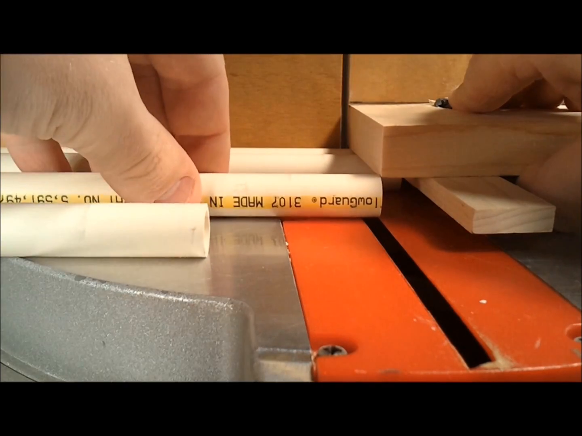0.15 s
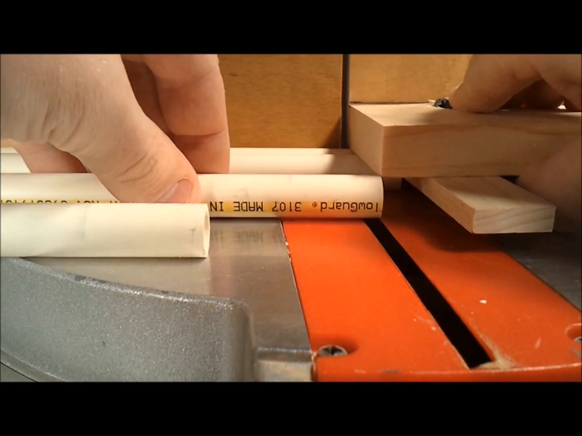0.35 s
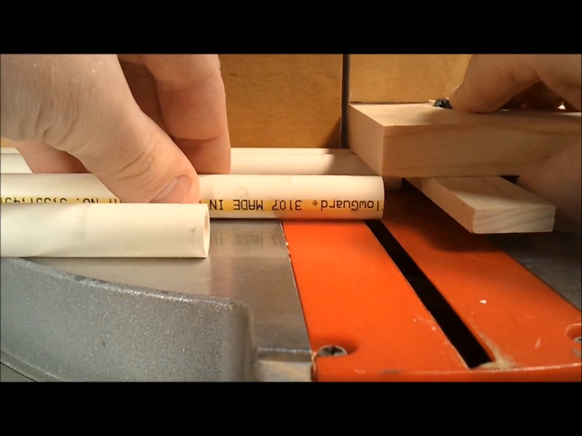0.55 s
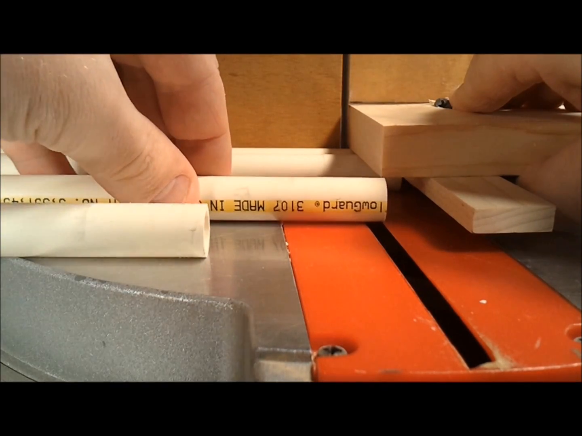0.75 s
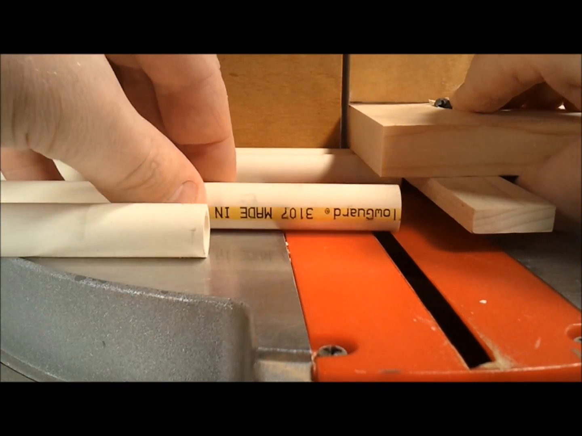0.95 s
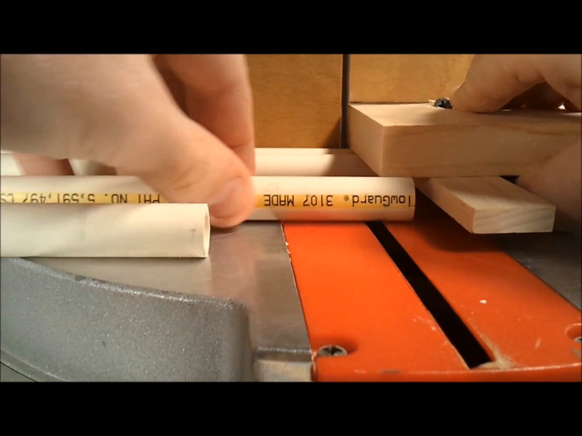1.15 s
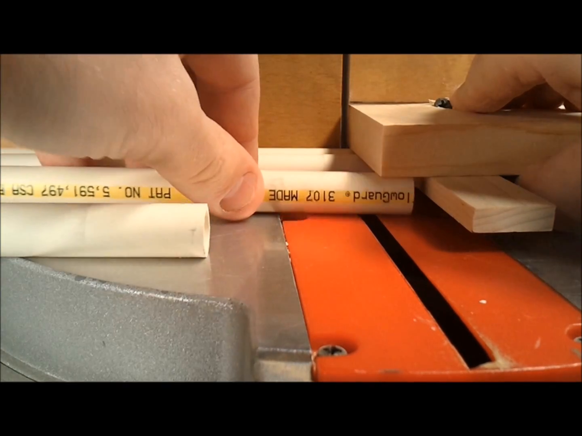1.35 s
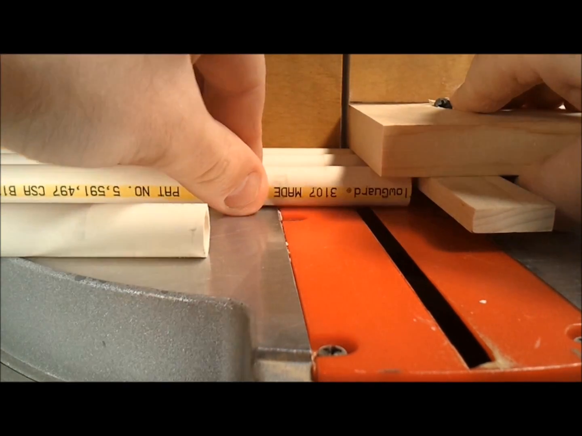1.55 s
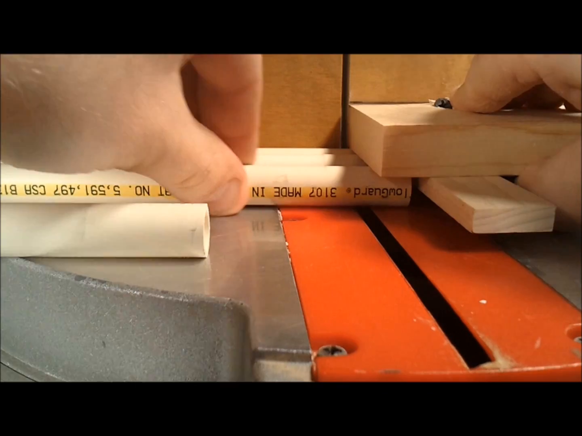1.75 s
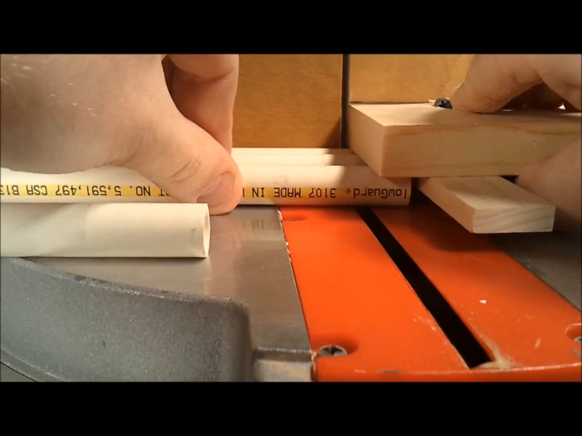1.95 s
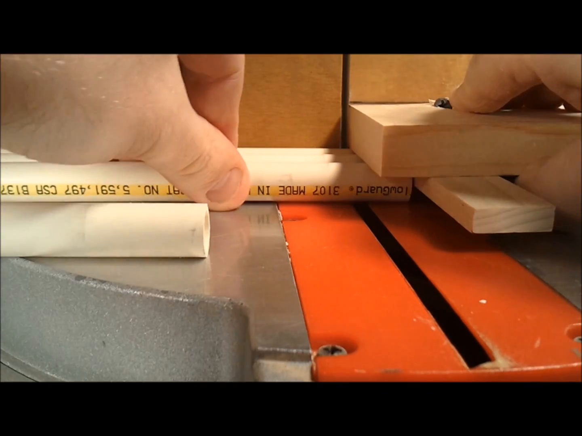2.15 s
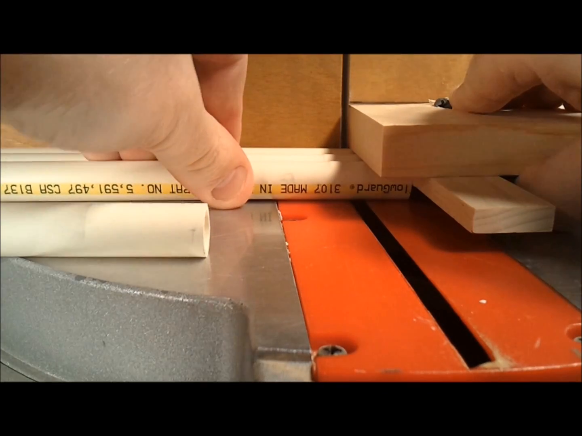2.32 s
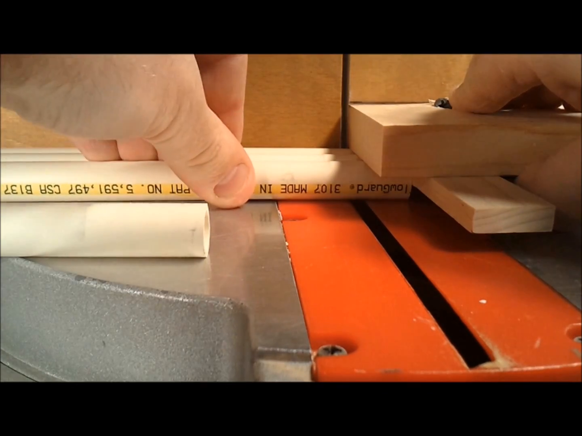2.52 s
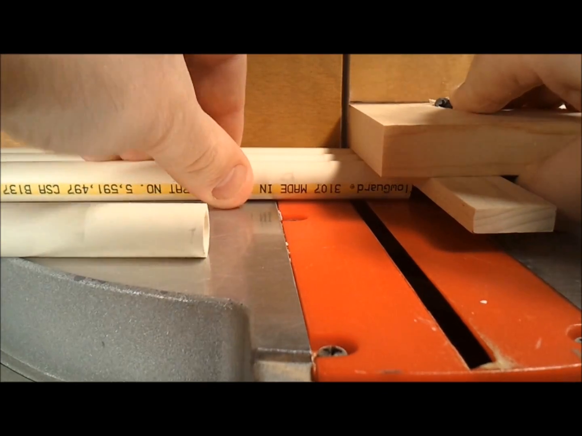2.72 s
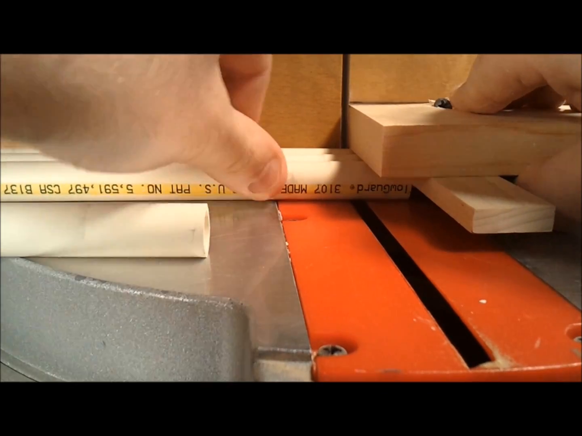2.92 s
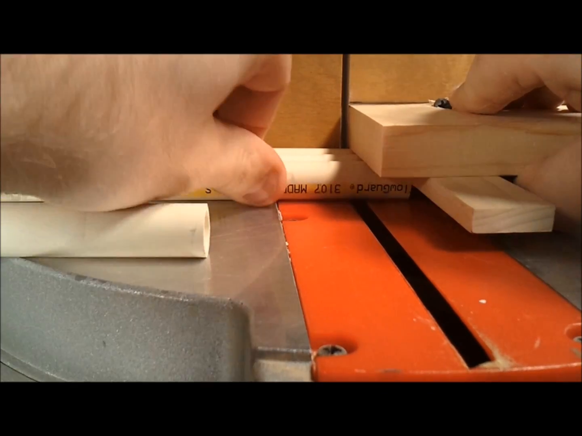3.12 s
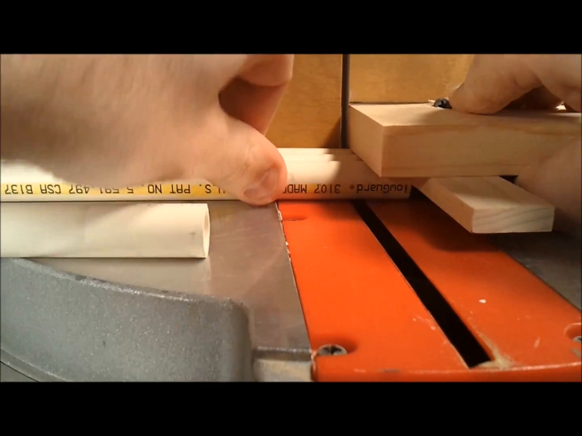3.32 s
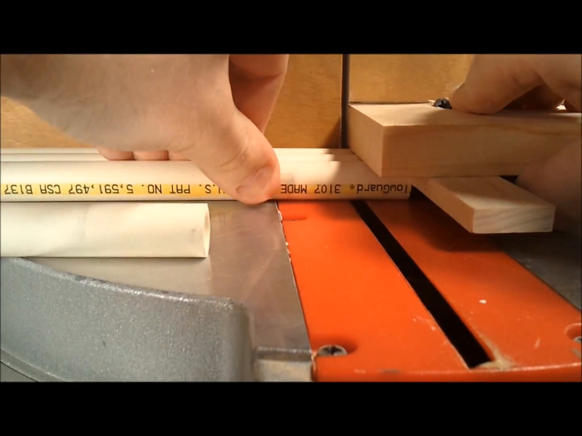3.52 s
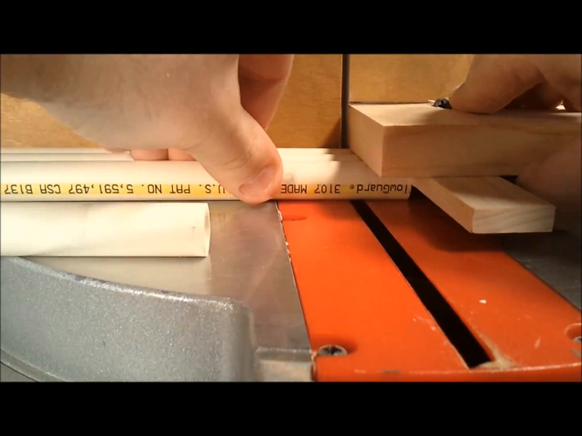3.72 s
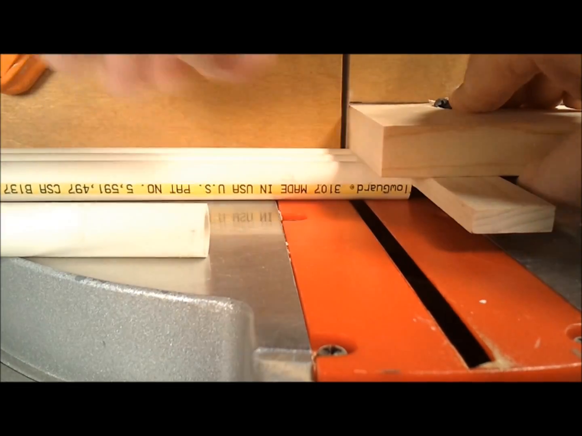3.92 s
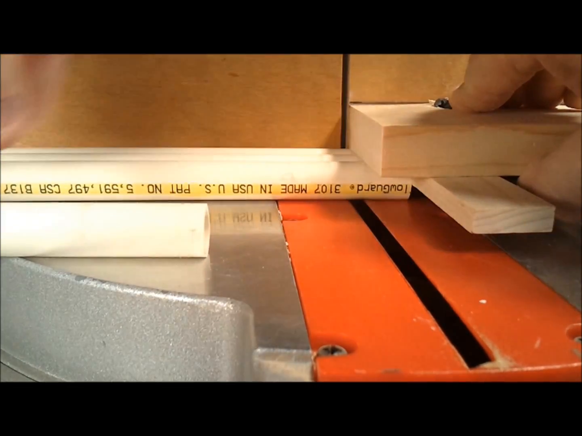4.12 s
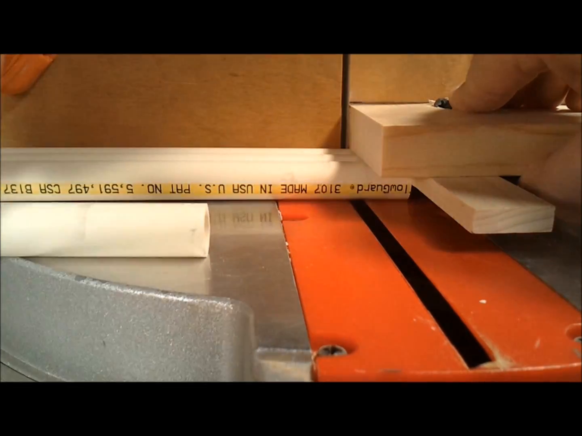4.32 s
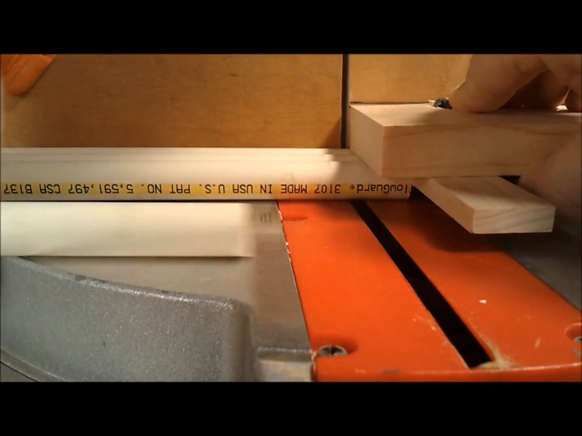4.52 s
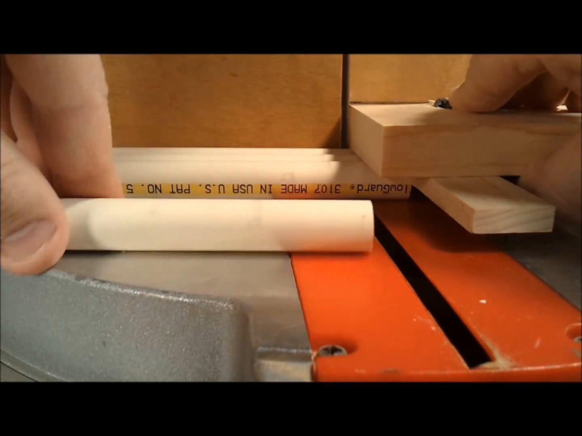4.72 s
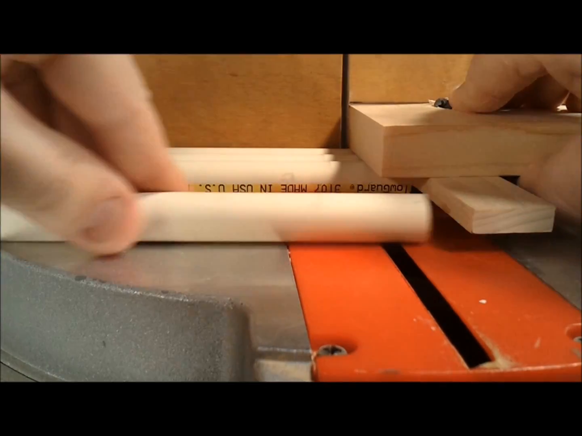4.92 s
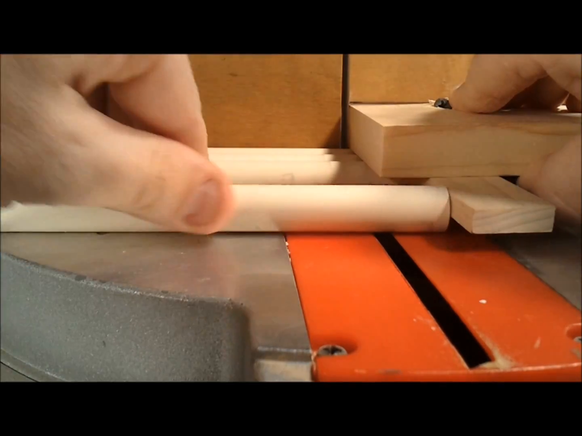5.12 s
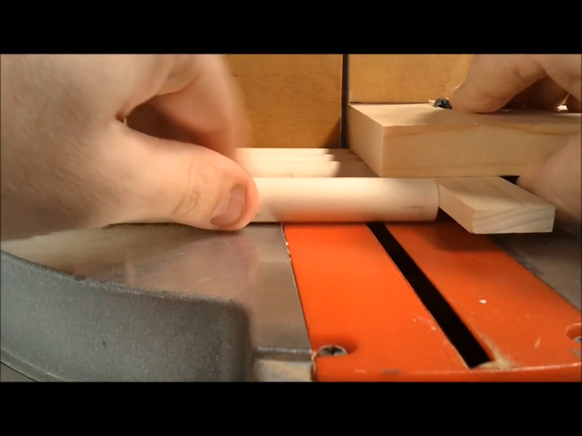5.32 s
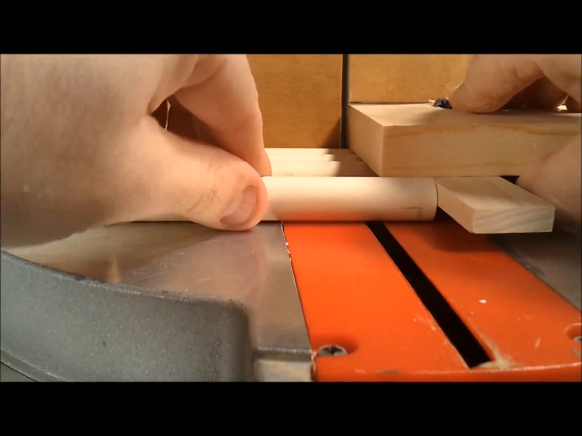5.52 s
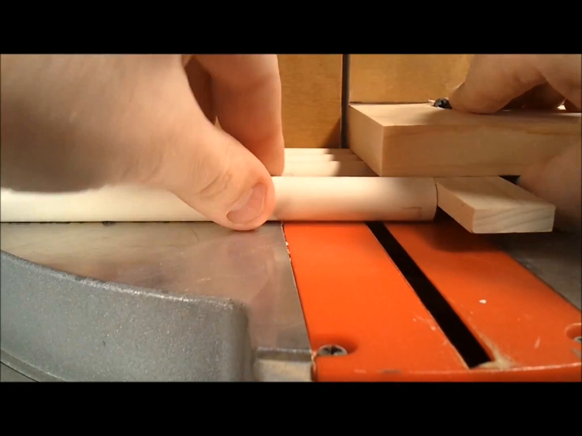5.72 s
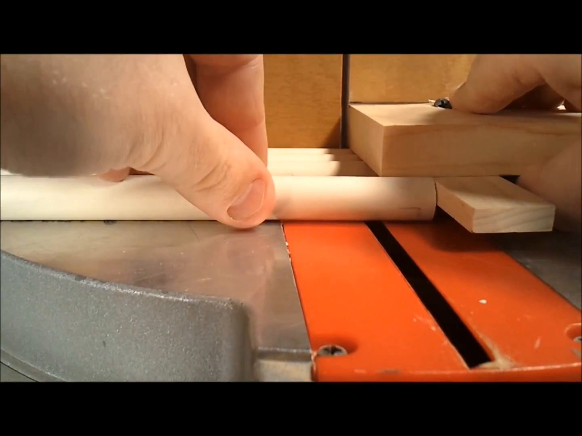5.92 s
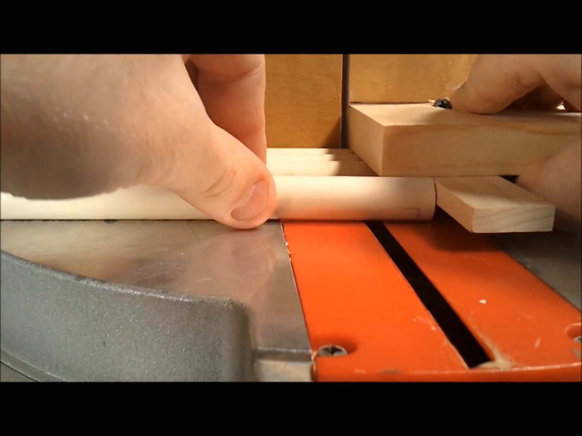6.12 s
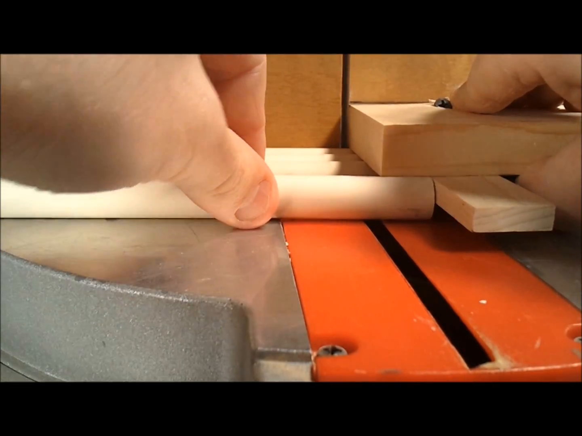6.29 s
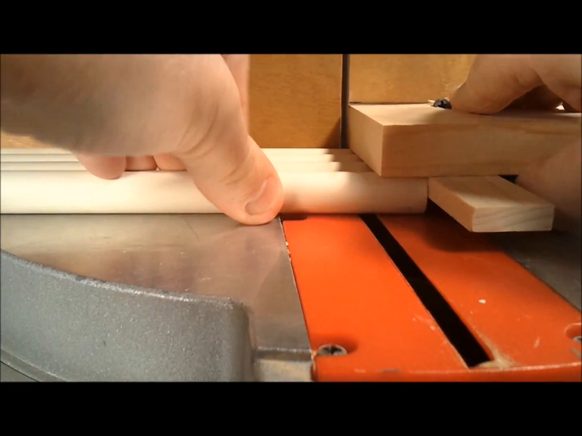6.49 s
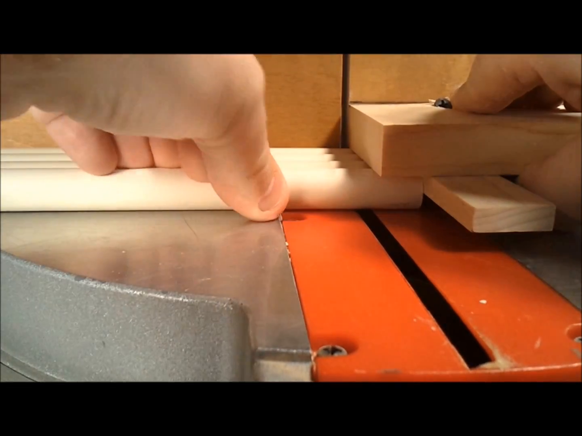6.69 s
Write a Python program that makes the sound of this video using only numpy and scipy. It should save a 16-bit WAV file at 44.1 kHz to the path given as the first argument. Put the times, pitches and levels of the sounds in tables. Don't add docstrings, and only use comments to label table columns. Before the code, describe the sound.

Hollow plastic clacks in uneven bursts, with dry gritty scrapes and small squeaks between them, near the microphone in a quiet small workshop.

```python
import sys
import numpy as np
from scipy import signal
from scipy.fft import rfft, irfft, next_fast_len
from scipy.io import wavfile
from scipy.ndimage import uniform_filter1d, map_coordinates

SR = 44100
rng = np.random.default_rng(int(sys.argv[2]) if len(sys.argv) > 2 else 0)


def natural_amplitude(level_db):
    exponent = np.asarray(level_db, float) / 20
    return 10 ** exponent


def inscribe(sig):
    pcm = np.round(np.clip(np.atleast_2d(sig).T, -1, 1) * 32767)
    wavfile.write(sys.argv[1], SR, pcm.astype(np.int16))


N = 297675


def unit(x):
    return x / np.sqrt(np.mean(x ** 2) + 1e-20)


def along(points, hz):
    f, v = np.transpose(points)
    return np.interp(np.log(hz + 1), np.log(f + 1), v)


def wobble(rate):
    knots = rng.standard_normal(int(N * rate / SR) + 4)
    return map_coordinates(knots, [np.arange(N) * rate / SR])


def filtered(x, response):
    m = next_fast_len(len(x) + 8192)
    spectrum = rfft(x, m) * response(np.fft.rfftfreq(m, 1 / SR))
    return irfft(spectrum, m)[:len(x)]


def resonances(peaks):
    def response(f):
        total = 0
        for k, (centre, width, db) in enumerate(peaks):
            damping = 1j * f * width
            total = total + (-1) ** k * natural_amplitude(db) * damping / (centre * centre - f * f + damping)
        return total
    return response


def near(hz, centre_hz, octaves):
    return np.exp(-.5 * (np.log2(hz / centre_hz) / octaves) ** 2)


def add_at(x, s, sound):
    x[round(s * SR):][:len(sound)] += sound


def ring(modes, t, favoured_hz, scatter_db, rise):
    x = np.zeros(len(t))
    for hz, db, t60 in modes:
        luck, side = rng.standard_normal(2)
        favour = 0.41 + near(hz, favoured_hz, octaves=0.26)
        decay = natural_amplitude(db + scatter_db * luck - 60 * t / t60)
        x += favour * decay * np.sign(side) * np.sin(2 * np.pi * hz * t)
    return x * (1 - np.exp(-t / rise)) / np.sqrt(len(modes))


def room(x):
    # frequency in Hz, t60 in seconds.
    room_decay = [(200, 0.26), (1000, 0.21), (3000, 0.35), (7000, 0.16)]
    hz, t, z = signal.stft(rng.standard_normal(SR // 2), SR, nperseg=256)
    decay = natural_amplitude(-60 * t / along(room_decay, hz)[:, None])
    tail = signal.istft(z * decay, SR, nperseg=256)[1]
    delayed = np.pad(x, (250, 0))
    return signal.fftconvolve(delayed, tail / np.linalg.norm(tail))[:len(x)]


def floor():
    # frequency in Hz, level in dB per Hz.
    floor_curve = [(12, -43), (20, -21), (33, -22.5), (86, -23.5), (320, -23.5), (1100, -31.5), (6220, -39),
                   (7400, -32.5)]
    colour = lambda f: natural_amplitude(along(floor_curve, np.minimum(f, 7000))) * (f < 9000)
    noise = filtered(rng.standard_normal(N), colour)
    return natural_amplitude(-60.5 + 0.34 * wobble(3.7)) * unit(noise)


def grit(rough_db, judder_db):
    return rng.standard_normal(N) * natural_amplitude(rough_db * wobble(900) + judder_db * wobble(45))


def sliding():
    # resonance in Hz, width in Hz, level in dB.
    dust_squeak = [(5560, 680, 0), (5680, 830, 0), (6300, 680, 5), (6890, 840, 2.5), (7470, 280, 0)]
    pipe_wall = [(2430, 870, -1.5), (2970, 140, 2.5), (3230, 240, -0.5), (3650, 140, 3), (4130, 280, 1.5),
                 (4700, 130, 2.5), (5180, 400, -1.5)]
    air_column = [(797, 190, -2), (971, 104, 4), (1180, 120, -0.5), (1425, 170, -6.5), (1536, 60, -2),
                  (1693, 40, -2), (2010, 110, -2.5), (1920, 680, -10)]
    table_body = [(176.2, 180, -3), (271.5, 56, 3), (324.4, 54, -1), (455, 29, 0), (498, 14, -3),
                  (631, 80, -3)]
    # start in seconds, hold in seconds, hiss in dB, pressure in dB, hiss centre in Hz.
    settling = [(0, 0.011, -69.5, 7.5, 6500), (.41, 0.01, -66.5, 8, 6200), (1.195, 0.0088, -33.5, -4, 6600),
                (1.25, 0.01, -49.5, 1.5, 6300), (1.218, 0.0089, -49, -12, 6600),
                (1.405, 0.035, -42, 0, 6300), (1.45, 0.011, -47, -6, 5600), (1.5, 0.031, -56, -11, 5900),
                (1.59, 0.0071, -54, -1, 6300), (1.65, 0.011, -55, 6.5, 6020),
                (1.706, 0.0072, -63, 6.5, 5970), (1.95, 0.023, -62, 3.5, 6300),
                (2.1, 0.0068, -51.5, -3.5, 6170), (2.17, .02, -59.5, -6, 5960),
                (2.255, 0.009, -73, 6, 6260), (2.33, 0.049, -74, 4, 6300), (3.01, 0.026, -61, -2.5, 6300),
                (5.02, 0.014, -51, 4, 6680), (5.08, 0.081, -52.5, 2.5, 6780), (5.24, .02, -61, 3.5, 6700),
                (5.29, 0.032, -54.5, 5, 6940), (5.36, 0.011, -53, -3, 6400),
                (1.33, .01, -40.5, -23.5, 7050), (6.51, 0.011, -46, -5, 5530)]
    slides = [
        (.11, 0.064, -68, 2, 6440),
        (.27, 0.095, -73, -9, 6430),
        (.79, 0.019, -49.5, -5, 6250),
        (.82, 0.11, -51, 1, 6280),
        (.97, 0.14, -55.5, 2, 6060),
        (1.068, 0.027, -44.5, -10, 6040),
        (1.1, 0.016, -61, 11.5, 6040),
        (1.135, .03, -52.5, -2, 6600),
        (5.195, 0.051, -51.5, 1.5, 6600),
        (5.26, 0.029, -50, -4, 7100),
    ]
    brushes = [(.205, 0.014, -56, 4.5, 6600), (.572, 0.014, -60.5, 9.5, 6230),
               (1.35, 0.053, -40.5, -3.5, 6640), (1.75, .1, -59.5, -8, 6700),
               (2.212, 0.023, -54.5, 5.5, 6200), (2.756, 0.086, -60.5, 3, 6500),
               (2.85, 0.16, -67.5, 2.5, 6200), (3.462, 0.022, -62, 0.5, 6200),
               (3.58, 0.055, -71.5, 15.5, 6040), (3.76, 0.037, -62, 4, 6600), (4.3, .008, -73.5, -6, 6700),
               (4.515, 0.0097, -38.5, 1, 6500), (4.56, 0.066, -51, -16.5, 6400),
               (4.62, 0.029, -44, 6, 6300), (5.44, 0.085, -60.5, -13, 6700), (5.62, 0.02, -59, -3, 6500),
               (5.68, 0.11, -64, -9, 6600), (6.28, 0.045, -60.5, 9, 6430), (6.335, 0.013, -46.5, 3, 6480),
               (6.405, 0.013, -43, -1.5, 6700), (6.44, 0.01, -42, -1.5, 6450), (6.465, 0.013, -39, 3, 6400),
               (6.745, 0.011, -61, -5, 6450)]
    skims = [(2.045, 0.04, -48.5, -6, 6460), (2.758, .012, -72.5, 10, 6300), (.692, 0.0061, -51.5, 1, 6400),
             (2.125, 0.024, -65, 11, 6200), (4.46, 0.043, -60, 6, 6300), (4.718, 0.023, -58.5, 15, 6240),
             (4.77, .03, -65, 5, 6100), (4.815, 0.037, -55.5, 6, 6600), (4.87, 0.1, -49.5, 4, 6170),
             (5.85, 0.031, -61, 8, 6140), (5.93, 0.039, -70, 10, 6300), (6.225, 0.019, -65.5, 4, 6220)]
    # rise and fall in dB per second; wall, air column and table in dB.
    brushing, pushing = (403.5, 332, -8, -10, -25), (601, 421, -4.5, -2, -6.5)
    rocking = (1496, 154.5, -3.5, -1, 0)
    skimming = (403, 396.5, -4, -2.5, -22)
    wall_load, air_load, table_load = 0.064, 0.86, 1.57
    dull_db_per_octave, usual_hz = -41.5, 6300

    ticks = np.arange(0, N + 64, 64) / SR
    power = np.zeros((len(dust_squeak) + 3, len(ticks)))
    for rows, motion in ((brushes, brushing), (slides, pushing), (skims, skimming), (settling, rocking)):
        rise, fall, wall_db, air_db, table_db = motion
        for s, hold, db, pressure, centre_hz in rows:
            before, after = np.maximum(s - ticks, 0), np.maximum(ticks - s - hold, 0)
            stroke = natural_amplitude(db - rise * before - fall * after)
            shares = np.array([0.24 + near(hz, centre_hz, octaves=0.12) for hz, _, _ in dust_squeak])
            shares = shares / np.linalg.norm(shares)
            wall = wall_db + wall_load * pressure + dull_db_per_octave * np.log2(centre_hz / usual_hz)
            bodies = natural_amplitude([wall, air_db + air_load * pressure, table_db + table_load * pressure])
            power += (np.append(shares, bodies)[:, None] * stroke) ** 2
    levels = [np.interp(np.arange(N) / SR, ticks, g) for g in np.sqrt(power)]

    x = np.zeros(N)
    for level, peak in zip(levels, dust_squeak):
        x += level * unit(filtered(grit(rough_db=2.0, judder_db=3.0), resonances([peak])))
    for level, body in zip(levels[len(dust_squeak):], (pipe_wall, air_column, table_body)):
        x += level * unit(filtered(grit(rough_db=3.0, judder_db=3.0), resonances(body)))
    return x


def thuds():
    # start in seconds, peak in dB, favoured mode in Hz, long frame ring in dB relative to the peak.
    blows = [(0.387, -42, 432, -15.5), (1.102, -40.5, 614, -12), (1.18, -25.5, 290, -21.5),
             (1.249, -31.5, 436, -28), (1.412, -37.5, 320, -19), (1.427, -34, 337, -28),
             (1.651, -32.5, 316, -21), (1.934, -37.5, 327, -26), (2.085, -39, 624, -30),
             (2.245, -39.5, 223, -27), (2.993, -47, 207, -16.5), (4.988, -25, 540, -14),
             (5.016, -25.5, 370, -26), (5.332, -60, 452, 4), (6.485, -55.5, 676, 2), (6.74, -49, 152, -24),
             (0, -56, 450, -0.5), (1.112, -46, 170, -24), (1.421, -35, 165, -32)]
    # frequency in Hz, level in dB, t60 in seconds.
    table_modes = [(165, -7.5, 0.22), (208.4, -1.5, 0.13), (270, -7, 0.1), (313.4, -3, 0.17),
                   (336.4, 0, 0.13), (518, -4, 0.089), (613, 1.5, 0.1), (700, -9, 0.17)]
    frame_hz, frame_t60, beat_hz = 439.3, 0.75, 23
    x, t = np.zeros(N + SR), np.arange(SR // 2) / SR
    for s, db, hz, frame_db in blows:
        beat = 1 + 0.43 * np.cos(2 * np.pi * beat_hz * t)
        frame = natural_amplitude(frame_db - 60 * t / frame_t60) * np.sin(2 * np.pi * frame_hz * (t + s))
        frame = frame * (1 - np.exp(-t / 0.0054)) * beat
        plate = natural_amplitude(0.5) * ring(table_modes, t, hz, scatter_db=-1.5, rise=0.0014)
        add_at(x, s, natural_amplitude(db) * (plate + frame))
    return x[:N]


def contacts():
    # start in seconds, crack peak in dB, pipe in dB relative to it,
    # favoured pipe mode in Hz, strongest crack in Hz.
    soft = [
        (0.383, -31, -5.5, 895, 2830),
        (1.5853, -36, -13, 875, 6510),
        (1.6305, -19, -14.5, 1130, 4580),
        (1.702, -30.5, -4.5, 970, 2670),
        (1.931, -32, -3, 760, 1910),
        (1.9400, -35, -1, 1200, 1660),
        (2.9872, -27, -17, 1020, 2400),
        (4.7112, -34, -5, 926, 5900),
        (5.0014, -32, 10.5, 790, 1520),
        (5.2124, -28.5, -6, 910, 7100),
    ]
    hard = [(0.3924, -37, 0, 910, 1930), (1.1033, -36.5, 4.5, 1000, 6900), (1.1755, -10.5, -2.5, 800, 6500),
            (1.2354, -23, -8.5, 1110, 6590), (1.4037, -25, -8, 930, 5830), (1.4183, -14, -12, 1130, 2920),
            (2.2403, -38, -6, 974, 4800), (3.2725, -42, -7, 877, 6300), (4.9878, -15.5, -6.5, 700, 6300),
            (5.2954, -47, -1, 960, 7000), (5.3334, -21.5, -9.5, 790, 5600), (6.4886, -6, -18.5, 1080, 5600)]
    # start in seconds, crack peak in dB, brightness in dB per octave, strongest crack in Hz.
    held = [(1.1728, -5, 1, 4700), (1.1839, -10.5, -2.5, 2900), (1.327, -29, 11.5, 7010),
            (1.4283, -6.5, 1, 5040), (1.4312, -16.5, -8, 4700), (1.638, -24.5, -4.5, 1700),
            (1.708, -42, -3, 2800), (1.926, -43, -3, 2300), (2.0814, -25.5, -5, 2300),
            (4.2999, -42.5, 4, 7030), (6.478, -15, 1, 6220), (6.491, -17, -3, 3000)]
    knocked = []
    for rows, tilt_db, rattle_t60 in ((soft, 0.5, 0.08), (hard, -1.5, 0.062)):
        for s, db, pipe_db, pipe_hz, crack_hz in rows:
            knocked.append((s, db, pipe_db, pipe_hz, tilt_db, crack_hz, rattle_t60))
    for s, db, tilt_db, crack_hz in held:
        knocked.append((s, db, -24, 1100, tilt_db, crack_hz, 0.061))
    return sorted(knocked)


def knocks():
    # frequency in Hz, level in dB, t60 in seconds.
    pipe_modes = [(736, 1.5, 0.038), (807, 2, 0.04), (947, 1.5, 0.069), (1131, 0.5, 0.085),
                  (1380, -8.5, 0.055), (1700, 8.5, 0.016), (2130, -18, 0.031)]
    # frequency in Hz, width in Hz, level in dB.
    crack_modes = [(1700, 1480, -2), (2375, 310, 4), (2790, 610, 0), (3840, 1100, 1.5), (4890, 540, 1),
                   (5600, 370, 4), (6600, 1200, 1.5)]
    x, t = np.zeros(N + SR), np.arange(SR // 3) / SR
    for s, db, pipe_db, pipe_hz, tilt_db, crack_hz, t60 in contacts():
        bright, dull = rng.standard_normal((2, len(t)))
        chatter = bright * natural_amplitude(-60 * t / (0.47 * t60))
        chatter += 0.91 * uniform_filter1d(dull, size=8) * natural_amplitude(-60 * t / t60)
        walls = []
        for hz, width, level in crack_modes:
            favour_db = 7 * near(hz, crack_hz, octaves=0.18)
            walls.append((hz, width, level + 1.9 * rng.standard_normal() + favour_db))
        colour = lambda f: natural_amplitude(tilt_db * np.log2((f + 300) / 3500)) * resonances(walls)(f)
        rattle = filtered(chatter, colour)
        blow = filtered(1. * (t == 0), colour)
        hit = 0.57 * rattle / np.abs(rattle).max() + 0.49 * blow / np.abs(blow).max()
        hit += natural_amplitude(pipe_db) * ring(pipe_modes, t, pipe_hz, scatter_db=1.2, rise=0.004)
        add_at(x, s, natural_amplitude(db) * (hit + natural_amplitude(-13.5) * room(hit)))
    return x[:N]


def rings():
    # start in seconds, frequency in Hz, level
    # in dB, t60 in seconds.
    knock_rings = [(0.383, 2780, -33, 0.014), (0.383, 1720, -34, 0.019), (0.383, 1110, -35.5, 0.019),
                   (0.383, 908, -35.5, 0.043), (1.1729, 4040, -18.5, 0.02), (1.1723, 5600, -22, 0.021),
                   (1.1728, 6580, -16.5, 0.031), (1.1728, 4766, -14, 0.032), (1.1726, 2970, -19, 0.031),
                   (1.1728, 806, -15.5, 0.027), (1.1728, 1140, -24.5, 0.065), (1.235, 1380, -37, 0.068),
                   (1.2359, 1098, -38, 0.087), (1.4185, 1110, -25, 0.018), (1.418, 2970, -31, 0.08),
                   (1.428, 4500, -20, 0.02), (1.428, 5330, -20, 0.017), (1.427, 4790, -21, 0.015),
                   (1.428, 4900, -18, 0.022), (1.427, 4310, -33, 0.022), (1.6314, 2960, -28, 0.022),
                   (1.6314, 4150, -36, 0.028), (1.6302, 2660, -36, 0.025), (1.6305, 850, -31.5, 0.026),
                   (1.6305, 1145, -38, 0.055), (1.702, 2780, -50, 0.025), (1.702, 950, -36.5, 0.04),
                   (1.702, 1130, -37, 0.02), (1.931, 1340, -41, 0.018), (1.931, 2470, -46, 0.02),
                   (1.94, 1650, -52, 0.068), (1.94, 1130, -47, 0.032), (2.0813, 2020, -42, 0.022),
                   (2.0802, 2310, -36, 0.02), (2.0813, 980, -45, 0.067), (2.9872, 1630, -35, 0.028),
                   (2.9867, 2050, -46, 0.02), (2.9866, 2320, -47, 0.032), (2.9882, 950, -50, 0.1),
                   (3.2725, 940, -57, 0.039), (4.3, 3190, -52, 0.02), (4.3, 7060, -50, 0.02),
                   (5.333, 6330, -32, 0.02), (5.3334, 2140, -37.5, 0.041), (5.3331, 982, -38, 0.1),
                   (5.3334, 790, -33.5, 0.081), (6.4888, 2860, -25, 0.02), (6.4886, 5160, -18, 0.02),
                   (6.4886, 6290, -19.5, 0.015), (6.4882, 3040, -21, 0.018),
                   (1.6, 255, -43, 0.093), (1.252, 870, -38, 0.048), (1.244, 2900, -35, .03),
                        (1.6305, 4900, -36, .025), (2.0813, 4450, -38.5, 0.033), (4.9885, 1150, -32, 0.081),
                        (2.9872, 2680, -43, .022), (4.991, 580, -31, 0.044), (1.3275, 7000, -29, .04),
                        (1.428, 950, -28, .05), (5.212, 2050, -44, .06), (1.4185, 5200, -25, .015),
                        (2.092, 620, -44, 0.084), (1.6305, 6000, -34, 0.027), (2.9872, 4700, -43, 0.022),
                        (4.9885, 5370, -23.5, 0.019), (4.9885, 6600, -30.5, .02),
                        (4.9885, 1000, -25.5, 0.017), (4.9885, 1850, -29, 0.023), (4.988, 2910, -36, 0.013),
                        (4.993, 690, -25, 0.043), (4.99, 330, -21, 0.04), (4.99, 265.4, -36, 0.32),
                        (4.991, 528, -27, 0.092), (4.992, 797, -34, 0.063), (5.017, 344, -32.5, 0.074),
                        (5.06, 255, -39, 0.15), (5.3334, 5270, -35, .02), (5.3334, 4170, -38, 0.024),
                        (5.3334, 2380, -38, 0.039), (6.4886, 3920, -21.5, 0.035),
                        (6.4884, 1147, -25, 0.049), (6.488, 6900, -19.5, .02)]
    x, t = np.zeros(N + SR), np.arange(SR // 3) / SR
    for s, hz, db, t60 in knock_rings:
        rise = 1 - np.exp(-t * hz / 0.92)
        add_at(x, s, natural_amplitude(db - 60 * t / t60) * np.sin(2 * np.pi * hz * t) * rise)
    return x[:N]


def catches():
    # centre in seconds, length in seconds, frequency in Hz, level in dB.
    swells = [(0.692, 0.0095, 1020, -50), (0.806, 0.009, 2010, -50), (0.821, 0.009, 970, -43),
              (0.823, 0.013, 1120, -48.5), (0.882, 0.008, 1760, -48), (0.888, 0.018, 996, -47),
              (0.891, 0.011, 1150, -49), (0.916, 0.011, 1120, -49.5), (0.938, 0.008, 860, -53),
              (0.952, 0.031, 900, -55.5), (1.01, 0.025, 1010, -58), (1.035, 0.014, 930, -55),
              (1.107, 0.016, 992, -37), (1.112, 0.019, 660, -48.5), (4.506, 0.009, 1600, -47.5),
              (4.528, 0.02, 970, -46.5), (4.524, 0.024, 1920, -53), (4.636, 0.035, 1000, -44),
              (4.642, 0.02, 2090, -49.5), (4.644, 0.012, 1890, -49), (4.645, 0.011, 1180, -47.5),
              (4.646, 0.02, 1540, -46), (4.72, 0.016, 1256, -48), (4.724, 0.017, 935, -38),
              (4.83, 0.024, 995, -53.5), (4.852, 0.014, 1390, -50), (4.853, 0.04, 1137, -47),
              (4.854, 0.031, 1700, -51.5), (4.86, 0.012, 2040, -49), (4.868, 0.05, 1010, -48),
              (4.906, 0.02, 940, -46), (4.911, 0.017, 1980, -47), (4.946, 0.013, 983, -44),
              (4.96, 0.03, 2040, -50), (5.094, 0.015, 940, -48.5), (5.105, 0.017, 785, -49),
              (5.138, 0.012, 766, -44), (5.159, 0.017, 935, -58), (5.172, 0.009, 790, -48),
              (5.218, 0.027, 920, -44.5), (5.258, 0.016, 1000, -54), (5.303, 0.017, 660, -48.5),
              (5.305, 0.014, 1010, -39.5), (5.828, 0.009, 990, -59.5), (5.888, 0.022, 900, -53),
              (6.41, 0.024, 1203, -53.5), (6.412, 0.013, 1020, -56), (6.444, 0.019, 1440, -53),
              (6.447, 0.013, 820, -49)]
    half = SR // 16
    x, t = np.zeros(N + SR), np.arange(-half, half) / SR
    for s, length, hz, db in swells:
        bell = natural_amplitude(db - 6 * (2 * t / length) ** 2)
        tone = np.sin(2 * np.pi * (hz * t + rng.random()))
        x[round(s * SR) - half:][:len(t)] += bell * tone
    return x[:N]


def squeaks():
    # start in seconds, length in seconds, frequency in Hz, peak level in dB.
    tones = [(0.806, 0.064, 4680, -55), (0.875, 0.072, 4300, -56), (1.327, 0.02, 6930, -42),
             (1.351, .06, 6650, -42.5), (1.351, 0.03, 2920, -47.5), (1.42, 0.0078, 5200, -30.5),
             (2.036, 0.046, 7100, -56), (2.04, 0.056, 6400, -52), (2.09, 0.046, 6050, -53.5),
             (2.13, .08, 6000, -62), (2.182, .058, 6550, -60), (2.205, .02, 6500, -48),
             (2.798, 0.047, 6890, -60), (4.5, 0.18, 5560, -48.5), (4.516, 0.02, 6960, -38),
             (4.553, 0.056, 3210, -61), (4.597, 0.081, 6300, -41.5), (4.89, 0.063, 4250, -59),
             (5.09, .09, 2540, -53), (5.09, 0.1, 3230, -55), (5.608, 0.11, 6420, -62)]
    x = np.zeros(N)
    for s, length, hz, db in tones:
        t = np.arange(round(length * SR)) / SR
        drift = 0.073 * np.cumsum(rng.standard_normal(len(t)))
        swell = np.sin(np.pi * t / length) ** 1.1
        add_at(x, s, natural_amplitude(db - 1.0) * swell * np.sin(2 * np.pi * hz * t + drift))
    return x


def blade_rings():
    # start in seconds, peak in dB.
    blade_hits = [
        (2.079, -53),
        (2.2406, -53.5),
        (2.987, -47),
        (4.651, -41.5),
        (4.71, -59),
    ]
    # frequency in Hz, level in dB, t60 in seconds.
    blade_modes = [(5850, -8, .25), (5900, 1.5, 0.47), (5950, -7.5, 0.21), (6040, -5, 0.46),
                   (6140, -4.5, 0.44), (6160, -10, .25)]
    x, t = np.zeros(N + SR), np.arange(SR // 2) / SR
    for s, db in blade_hits:
        add_at(x, s, natural_amplitude(db - 3) * ring(blade_modes, t, 6000, scatter_db=1, rise=.01))
    return x[:N]


def lean():
    # time in seconds, level in dB.
    weight = [
        (6.15, -96),
        (6.26, -71),
        (6.326, -64),
        (6.422, -58.5),
        (6.482, -47.5),
        (6.7, -74),
        (6.732, -73),
        (6.75, -63),
    ]
    # frequency in Hz, width in Hz, level in dB.
    bench_modes = [(46, 13, -2.5), (95, 220, 5)]
    s, db = np.transpose(weight)
    level = natural_amplitude(np.interp(np.arange(N) / SR, s, db, left=-120))
    return level * unit(filtered(rng.standard_normal(N), resonances(bench_modes)))


def scene():
    rub = sliding() + squeaks()
    rub = filtered(rub, lambda f: (1j * f / (130 + 1j * f)) ** 2)
    caught, rung = natural_amplitude(-1.5) * catches(), rings()
    x = rub + rung + natural_amplitude(-13.5) * room(rub + rung + caught)
    x += knocks() + thuds() + blade_rings() + lean() + floor()
    return (x + caught * natural_amplitude(3.5 * wobble(320)))[None]


def top_cut(x):
    return signal.sosfilt(signal.butter(12, 15600, fs=SR, output="sos"), x)


def record(dry):
    # frequency in Hz, level in dB.
    band_edge = [(7000, 0), (7300, -5), (7600, -17), (7720, -32), (7900, -47), (8600, -48), (8850, -62),
                 (16000, -72)]
    offset = -.00682
    x = filtered(dry[0], lambda f: natural_amplitude(along(band_edge, f)))
    x = x - 0.027 * x ** 3 + natural_amplitude(-95.0) * rng.standard_normal(N) + offset
    return top_cut(x[None])


dry = scene()
out = record(dry)
inscribe(out)
```